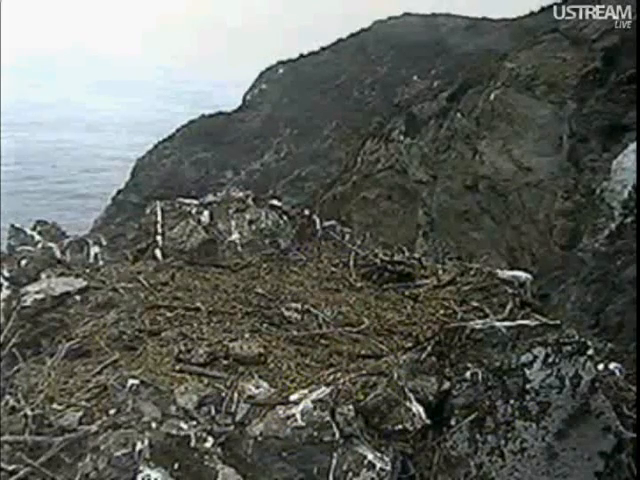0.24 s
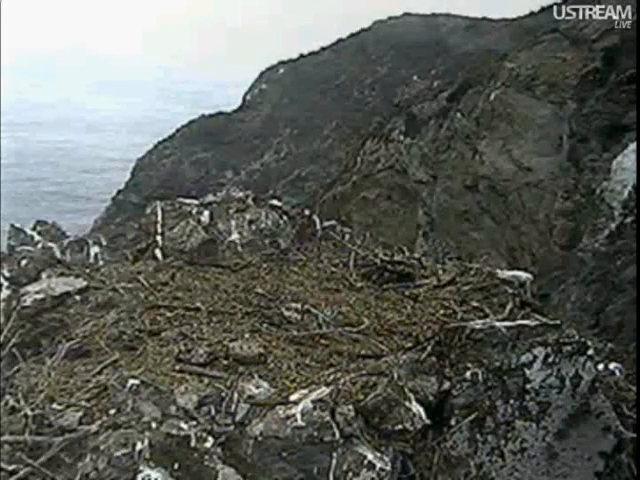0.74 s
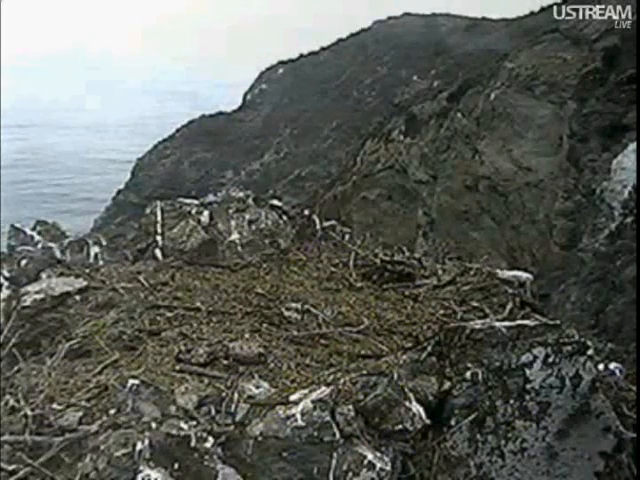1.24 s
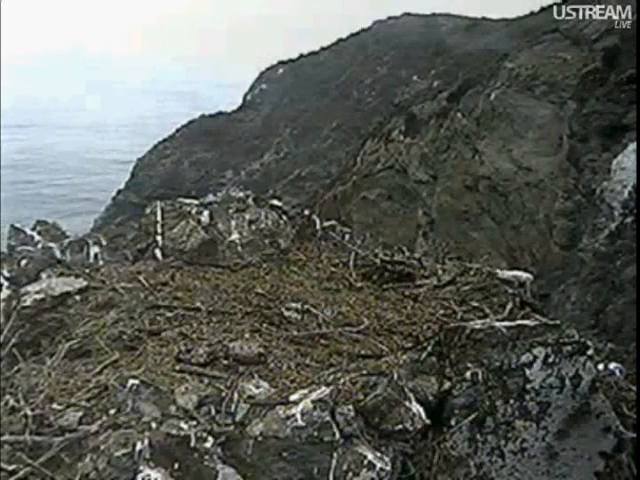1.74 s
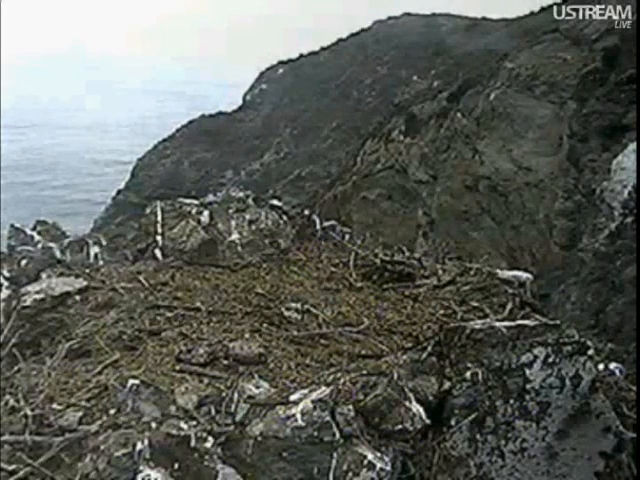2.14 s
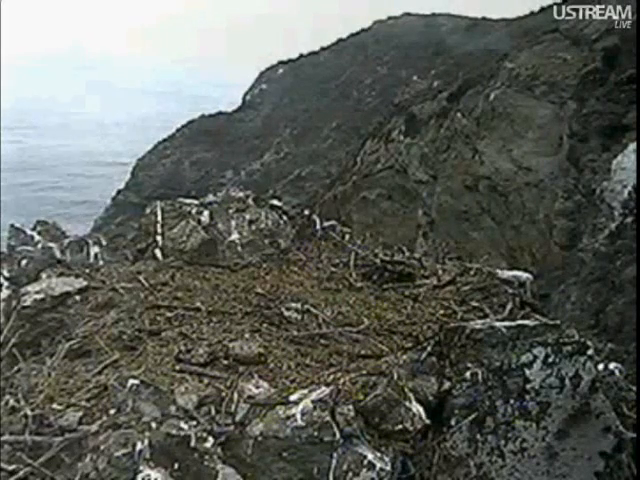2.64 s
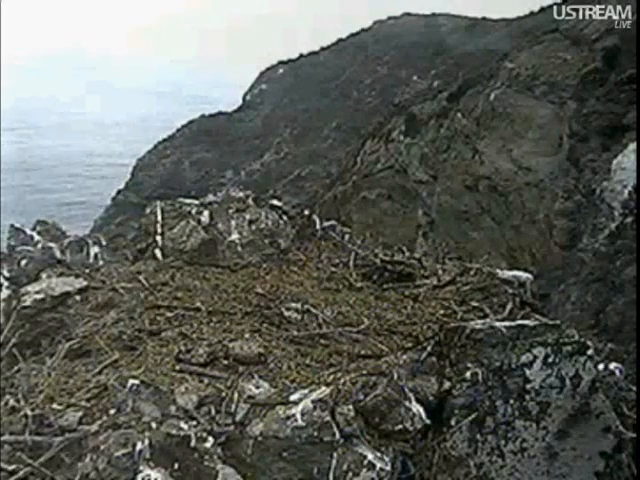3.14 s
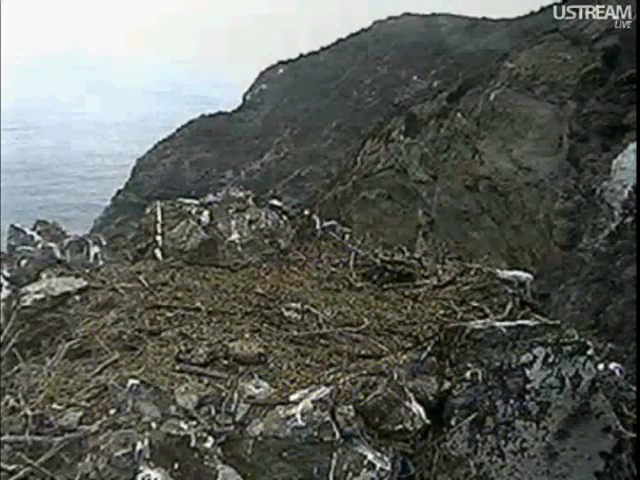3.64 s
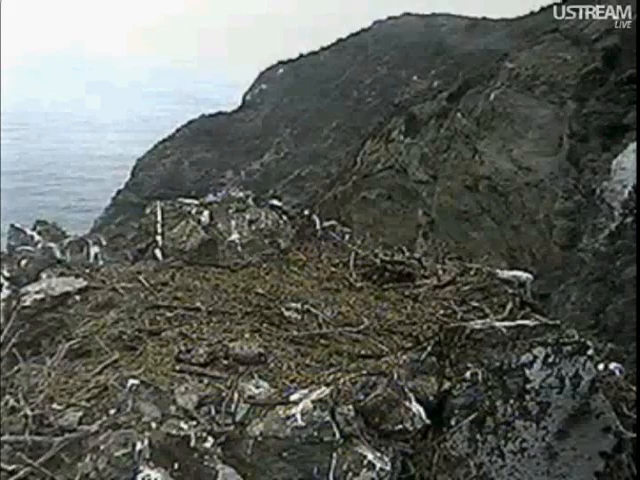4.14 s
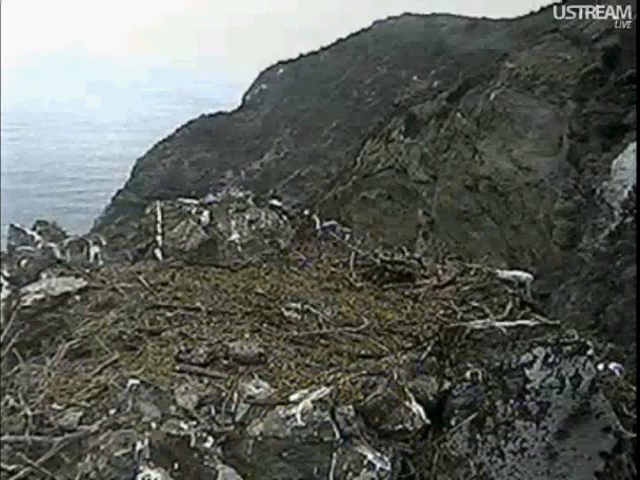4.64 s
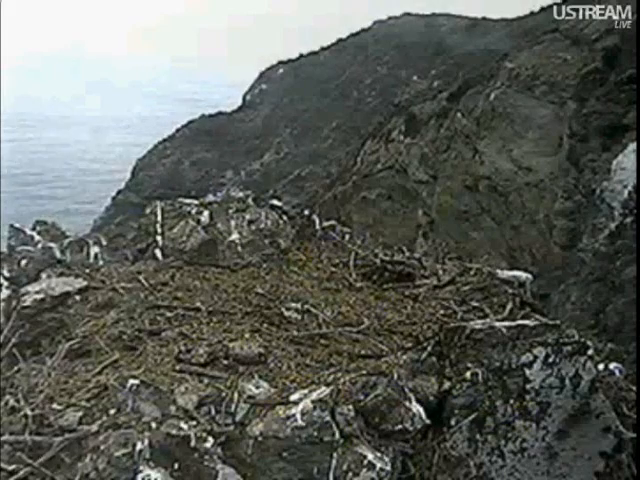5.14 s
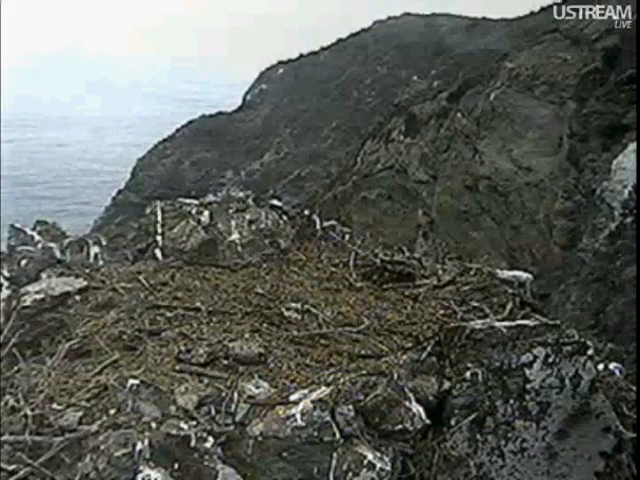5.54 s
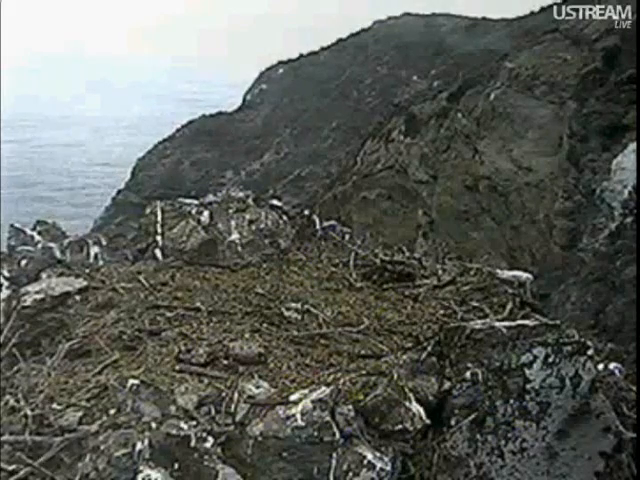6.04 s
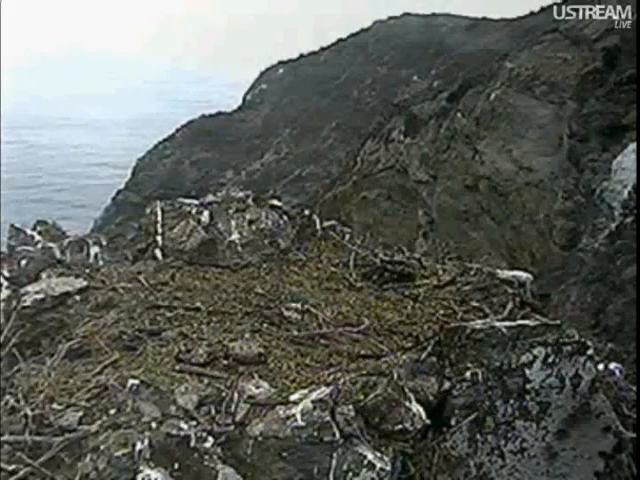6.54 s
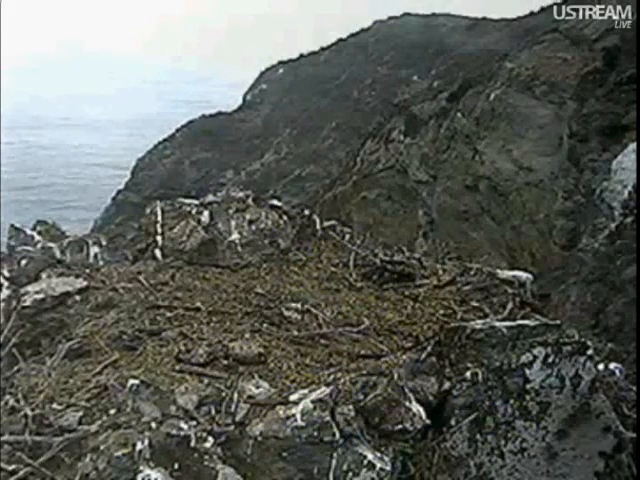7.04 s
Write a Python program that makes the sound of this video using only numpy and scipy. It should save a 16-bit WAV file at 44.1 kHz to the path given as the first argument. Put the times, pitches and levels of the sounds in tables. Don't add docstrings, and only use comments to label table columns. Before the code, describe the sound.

High, quick bird trills, clucks and hard yelps come in bursts with rocky echoes, above a constant distant surf wash.

```python
import sys
import numpy as np
from scipy import signal
from scipy.fft import rfft, irfft, next_fast_len
from scipy.io import wavfile
from scipy.ndimage import uniform_filter1d

SR = 44100
rng = np.random.default_rng(int(sys.argv[2]) if len(sys.argv) > 2 else 0)


def gain_from_db(level_db):
    decades = np.asarray(level_db, float) / 20
    return 10 ** decades


def file_out(sig):
    cols = np.atleast_2d(sig).T
    lim = np.clip(cols, -1, 1)
    pcm = np.round(lim * 32767).astype(np.int16)
    wavfile.write(sys.argv[1], SR, pcm)


N = 321930


def evened(x):
    return x / np.sqrt(np.mean(x ** 2) + 1e-20)


def smoothed(x, size):
    return uniform_filter1d(uniform_filter1d(x, size=size), size=size)


def add(mix, start_s, sound):
    part = mix[max(round(start_s * SR), 0):][:len(sound)]
    part += sound[:len(part)]


def coloured(x, gain):
    size = next_fast_len(len(x))
    return irfft(rfft(x, size) * gain(np.fft.rfftfreq(size, 1 / SR)), size)[:len(x)]


def whistle(length_s, start_hz, mid_hz, end_hz, partials_db, rough, bounce,
            sharp=2.4, fade_db=5.0, rise_s=0.0044, size=130):
    u = np.linspace(0, 1, max(round(length_s * SR), 64))
    luck = rng.random(2)
    air = rng.standard_normal((2, 5000))
    arch = (1 - abs(2 * u - 1) ** sharp) * (mid_hz - (start_hz + end_hz) / 2)
    pitch_hz = start_hz + (end_hz - start_hz) * u + arch
    turns = np.cumsum(pitch_hz) / SR + luck[0]
    shimmer = evened(smoothed(air, size))[:, 300:300 + len(u)]
    blur = np.sqrt(1 - rough) + np.sqrt(rough) * (shimmer[0] + 1j * shimmer[1]) / np.sqrt(2)
    tone = sum(gain_from_db(db) * np.exp(2j * np.pi * (k + 1) * turns) for k, db in enumerate(partials_db))
    onset = np.minimum(u * length_s / min(rise_s, 0.55 * length_s), 1)
    release = np.minimum((1 - u) * length_s / 0.0071, 1)
    tone = (tone * blur).imag * onset * release * gain_from_db(fade_db * (.5 - u))
    lag = round(SR * (.007 + .006 * luck[1]))
    return np.r_[tone, np.zeros(lag)] + bounce * np.r_[np.zeros(lag), tone]


def upper_trills():
    # start_s, length_s, pitch_hz, level_db, fade_db (across the note)
    upper_notes = [(1.185, 0.011, 4000, -43, 0), (1.198, 0.027, 4147, -27.5, 3),
                   (1.301, 0.043, 4310, -38, 6), (1.431, 0.064, 4300, -41, 15),
                   (2.401, 0.037, 4020, -46, 0), (2.041, 0.047, 4010, -53, 0), (2.132, 0.033, 4100, -31, 4),
                   (2.241, .062, 4090, -36.5, 20), (2.46, 0.018, 3820, -44, 0),
                   (4.532, 0.033, 4110, -42, -5), (4.805, 0.048, 4110, -32.5, 7),
                   (4.934, 0.054, 4070, -35, -3), (5.079, 0.035, 3950, -39.5, 0),
                   (6.066, 0.06, 4190, -37.5, -3), (6.172, 0.046, 4470, -29, -4),
                   (6.278, 0.039, 4470, -29, -3), (6.479, .042, 4280, -33.5, 0.5),
                   (6.58, 0.046, 4130, -35.5, 8), (6.727, 0.0099, 4520, -45, 1),
                   (7.139, 0.024, 4160, -31, 4), (7.255, 0.037, 4120, -35, 9), (2.342, .04, 4000, -40, 9)]
    return [(s, n, hz * (1 - 0.042), hz, hz * (1 - 0.0098), db, fade, .009)
            for s, n, hz, db, fade in upper_notes]


def lower_trills():
    # start_s, length_s, pitch_hz, level_db
    lower_notes = [(1.217, 0.032, 3350, -39), (1.306, .04, 3130, -47), (1.423, 0.019, 3460, -41),
                   (1.463, 0.016, 3300, -34.5), (1.786, .05, 3320, -70), (2.03, 0.03, 3125, -47),
                   (2.126, 0.019, 3170, -36.5), (2.16, 0.017, 3190, -40), (2.23, 0.058, 3210, -49),
                   (2.35, 0.02, 3190, -50), (2.454, 0.035, 3084, -38.5), (2.732, .04, 3080, -54),
                   (4.603, 0.02, 3200, -42), (4.618, 0.019, 3125, -37.5), (4.674, 0.016, 3260, -37.5),
                   (4.806, .016, 3145, -39.5), (4.765, 0.013, 3190, -25.5), (4.936, 0.038, 3220, -30.5),
                   (5.079, 0.025, 3190, -32.5), (5.111, 0.028, 3090, -40.5), (5.327, 0.076, 3034, -45.5),
                   (6.169, .03, 3240, -48.5), (6.291, 0.029, 3152, -33.5), (6.512, 0.017, 3380, -29.5),
                   (6.702, 0.023, 3455, -27.5), (7.115, 0.048, 3320, -44), (7.153, 0.032, 3254, -37),
                   (7.253, 0.017, 3370, -31.5), (7.286, 0.045, 3210, -30.5)]
    return [(s, n, hz * (1 - 0.0076), hz, hz * (1 - 0.011), db, 5.5, .005) for s, n, hz, db in lower_notes]


def hooked_falls():
    # start_s, length_s, top_hz, level_db, fade_db (across the note)
    fall_notes = [(4.426, 0.056, 4147, -31.5, 4.5), (4.562, 0.02, 4390, -33.5, -2),
                  (4.583, .02, 4250, -42, -3), (7.025, 0.035, 4210, -38.5, -3),
                  (7.126, 0.014, 4280, -36, 2), (7.238, 0.025, 4230, -40, 0),
                  (4.67, 0.049, 4215, -32.5, -1), (6.378, 0.045, 4420, -32.5, 6)]
    return [(s, n, hz * (1 - 0.043), hz, hz * (1 - 0.088), db, fade, .009)
            for s, n, hz, db, fade in fall_notes]


def stray_chips():
    # start_s, length_s, pitch_hz, level_db
    stray_notes = [(0, 0.027, 3120, -33.5), (0.036, 0.097, 3140, -46), (0.092, 0.019, 3160, -44),
                   (0.267, 0.011, 3020, -32), (0.331, 0.009, 3990, -39), (0.705, 0.007, 3290, -47),
                   (0.774, 0.012, 3090, -29.5), (0.784, 0.0093, 3110, -33.5), (1.388, .014, 3040, -33.5),
                   (1.355, 0.017, 3140, -37), (1.099, 0.012, 3340, -41.5), (1.119, 0.022, 2940, -36),
                   (1.132, 0.021, 3070, -31.5), (1.121, 0.01, 3590, -40), (1.44, 0.011, 2670, -46),
                   (2.03, 0.01, 1320, -54), (2.937, 0.032, 2465, -50.5), (0.334, 0.021, 3086, -31),
                   (3.555, 0.021, 3120, -45.5), (3.642, 0.015, 3000, -52), (3.805, 0.041, 3090, -55),
                   (4.094, .046, 3210, -59), (4.15, 0.043, 3600, -64), (4.56, 0.06, 5110, -40.5),
                   (4.681, 0.05, 5110, -48), (4.73, 0.045, 5220, -54), (5.719, 0.031, 3010, -55),
                   (6.047, 0.026, 1430, -50.5), (6.053, 0.022, 2975, -43.5), (7.035, 0.062, 3500, -43)]
    return [(s, n, hz * (1 - 0.011), hz, hz * (1 - 0.011), db, 5.5, .0045) for s, n, hz, db in stray_notes]


def far_notes(perches):
    notes = upper_trills() + lower_trills() + hooked_falls() + stray_chips()
    for k, (s, length, start, mid, end, db, fade_db, rise_s) in enumerate(notes):
        rough = np.clip((-27 - db) / 55, .03, .27)
        partials_db = [db, 1.5 * db - 18.5]
        add(perches[k % 2], s, whistle(length, start, mid, end, partials_db, rough, 0.21,
                                       2.14, fade_db, rise_s, size=105))


def yelps(perches):
    # start_s, length_s, pitch_hz, level_db, beats_per_s
    yelp_notes = [(1.55, 0.046, 3450, -26, 42), (1.657, 0.037, 3360, -23.5, 56),
                  (5.217, .04, 3070, -24, 76), (6.676, 0.026, 3330, -16.5, 125),
                  (7.004, 0.025, 3380, -14, 66)]
    for k, (s, length, hz, db, beats) in enumerate(yelp_notes):
        end = hz + 330 - 9000 * length
        note = whistle(length, hz - 130, hz, end, [db, 1.77 * db - 14.0], 0.036, .2, fade_db=2.0)
        throb = np.sqrt(abs(np.sin(np.pi * beats * np.arange(len(note)) / SR)))
        add(perches[k % 2], s, note * (1 - .85 * (1 - throb)))


def low_bird(perch):
    # start_s, length_s, pitch_hz, level_db (fundamental), octave_db
    low_notes = [(0.255, 0.013, 2480, -31, -60), (0.265, 0.015, 2570, -29, -49),
                 (0.698, 0.013, 2510, -35, -61), (.706, 0.013, 2580, -34, -50.5),
                 (1.108, 0.012, 2490, -28.5, -56), (3.645, 0.0097, 2800, -41, -44),
                 (4.622, 0.026, 2560, -46.5, -68), (4.767, 0.034, 2560, -45, -58),
                 (6.17, 0.04, 2620, -59, -39), (6.229, 0.052, 2583, -29, -34.5),
                 (6.309, 0.059, 2666, -25, -26.5), (6.395, 0.06, 2668, -24, -25.5),
                 (6.498, 0.034, 2621, -32.5, -18.5), (6.598, 0.039, 2578, -18.5, -26.5),
                 (6.705, 0.027, 2503, -25, -44), (6.731, 0.0083, 1950, -27.5, -35),
                 (6.815, .02, 1891, -28.5, -38), (6.934, 0.0076, 1540, -29, -28.5)]
    for s, length, mid, db, octave_db in low_notes:
        third_db = min(db, octave_db) - 15.5
        edge = mid - 1600 * length
        fade_db = 12.0 if length < .033 else 1.5
        add(perch, s, whistle(length, edge, mid, edge, [db, octave_db, third_db], .025, .15,
                              fade_db=fade_db, rise_s=max(.13 * length, .004)))


def chatter(perches):
    # start_s, length_s, lowest_hz, level_db
    chatter_notes = [(0.249, 0.052, 3120, -44.5), (0.298, 0.032, 3390, -43), (.352, 0.035, 3060, -37),
                     (0.693, .037, 3120, -43.5), (0.733, 0.041, 2914, -44.5), (1.1, 0.018, 3070, -40.5),
                     (2.74, 0.015, 2820, -51), (4.8, 0.023, 3140, -41), (6.375, 0.018, 3380, -40),
                     (6.475, 0.018, 3030, -40.5), (6.56, 0.021, 3060, -39.5), (6.58, .018, 3150, -32.5),
                     (6.215, 0.037, 3050, -48.5), (6.31, 0.041, 3030, -46), (6.405, 0.04, 3110, -46),
                     (6.315, 0.023, 3850, -47.5), (6.42, 0.033, 3890, -50), (6.6, .04, 3030, -43),
                     (6.525, .03, 3150, -43.5), (.272, 0.033, 3440, -45), (.74, .035, 3350, -44)]
    for k, (s, length, low, db) in enumerate(chatter_notes):
        edge = low * (1 + 0.11)
        add(perches[k % 2], s, whistle(length, edge, low, edge, [db], .4, bounce=0.38, size=60))


def peeps(perch):
    # start_s, length_s, lowest_hz, level_db
    peep_notes = [(1.353, .05, 2680, -46), (2.254, 0.055, 2670, -39.5), (3.641, 0.053, 2676, -44),
                  (4.168, 0.044, 2770, -43.5), (6.083, 0.046, 2770, -43.5)]
    for s, length, low, db in peep_notes:
        add(perch, s, whistle(length, low * 1.6, low, low * 1.4, [db], .12, 0.3, 1.4, fade_db=-6.5))


def squeaks(perch):
    # start_s, length_s, final_hz, level_db
    squeak_notes = [(0.266, 0.014, 2940, -36), (1.29, 0.031, 5120, -44.5), (4.543, 0.016, 5060, -38),
                    (4.667, 0.011, 5050, -45)]
    for s, length, end, db in squeak_notes:
        add(perch, s, whistle(length, end * 1.15, end * 1.03, end, [db], .4, .4, 1.4))


def murmurs(perch):
    # start_s, length_s, pitch_hz, level_db
    murmur_notes = [(2.3, 0.031, 3060, -56), (2.51, .06, 4020, -58), (2.593, 0.046, 3960, -61),
                    (4.63, .04, 5150, -58), (4.78, 0.061, 5200, -57), (6.363, 0.029, 2590, -29),
                    (6.449, 0.052, 2582, -36.5), (6.525, 0.018, 2575, -23), (6.628, 0.029, 2625, -55),
                    (2.023, 0.013, 1430, -40.5), (2.04, 0.013, 1530, -52), (0.133, 0.058, 3210, -50),
                    (1.347, .075, 4340, -53), (1.497, .1, 4230, -57), (2.506, .05, 3070, -49),
                    (2.585, .065, 3140, -47.5), (5.263, .06, 3040, -48.5), (5.392, .09, 3030, -52),
                    (5.0, .07, 3210, -57), (6.237, .035, 4350, -43)]
    for s, length, hz, db in murmur_notes:
        add(perch, s, whistle(length, hz, hz, hz, [db], rough=.12, bounce=.2))


def ticks():
    # start_s, level_db, centre_hz, width_hz
    tick_events = [(0.272, -43, 3600, 1500), (0.31, -46, 3420, 1200), (0.316, -49, 5200, 500),
                   (0.335, -46, 5300, 500), (0.777, -47, 5300, 500), (1.119, -46, 5100, 500),
                   (0.74, -44, 3400, 1000), (0.694, -40, 3200, 1200), (1.103, -45, 3200, 1200),
                   (1.194, -43, 1400, 800), (1.302, -41.5, 5100, 2490), (1.432, -43.5, 4480, 2960),
                   (2.952, -36, 1190, 400), (4.804, -47, 3620, 1190), (4.935, -41, 3300, 1000),
                   (4.937, -47, 2600, 400), (6.18, -44, 3220, 900), (6.17, -39.5, 5340, 1200),
                   (6.285, -32, 3840, 2150), (6.477, -36, 3500, 1000), (6.6, -30, 3600, 2540),
                   (6.708, -35, 4500, 1800), (6.932, -33, 1100, 600), (7.052, -32.5, 1020, 300),
                   (7.124, -47.5, 4070, 3550)]
    out = np.zeros(N)
    puffs = rng.standard_normal((len(tick_events), 270))
    for (s, db, centre, width), puff in zip(tick_events, puffs):
        band = coloured(puff, lambda hz: np.exp(-((hz - centre) / width) ** 2 * 2))
        add(out, s - .003, gain_from_db(db) / 3 * evened(band) * np.hanning(len(puff)))
    return out


def eagles():
    perches = np.zeros((3, N))
    far_notes(perches)
    yelps(perches)
    chatter(perches)
    low_bird(perches[2])
    peeps(perches[2])
    squeaks(perches[2])
    murmurs(perches[2])
    return perches + ticks()


def cliff(perches):
    # delay_s, level_db
    ledges = [(.006, -4), (.011, -2), (.019, -20.5), (.034, -13.5), (.052, -21), (.11, -17), (.16, -15.5)]
    t = np.arange(SR) / SR
    taps = rng.choice([-1., 1.], (3, SR)) * (rng.random((3, SR)) < 2000 / SR) / np.sqrt(2000)
    near_tail = gain_from_db(2.5 - 60 * t / 0.2)
    cove_tail = gain_from_db(-4.5 - 60 * t / 1.38)
    taps *= (near_tail + cove_tail) * np.minimum(t / 0.02, 1)
    stretch = rng.uniform(.8, 1.25, (3, len(ledges)))
    for k, (s, db) in enumerate(ledges):
        taps[np.arange(3), (s * stretch[:, k] * SR).astype(int)] += gain_from_db(db - 1.5)
    taps *= gain_from_db([[0.5], [0.5], [-6.0]])
    echoes = signal.fftconvolve(perches, taps, axes=1)[:, :N].sum(0)
    echoes = signal.hilbert(echoes, next_fast_len(N))[:N]
    gusts = evened(smoothed(rng.standard_normal((2, N)), 400))
    return (echoes * (.97 + .12 * (gusts[0] + 1j * gusts[1]))).real


def surf():
    # frequency_hz, density_db (per Hz)
    wash_spectrum = [(12, -32.5), (20, -2), (33, -23.5), (86, -33), (181, -32.5), (210, -38.5), (232, -32),
                     (420, -26), (705, -23.5), (779, -21), (1100, -13.5), (1480, -29), (3040, -35.5),
                     (3350, -37), (7400, -38.5), (9620, -75.5), (16300, -120)]
    # time_s, level_db
    wash_level = [(0, -45), (1.5, -45.5), (3, -44.5), (3.8, -46), (5, -44.5), (6, -44.5), (6.9, -43.5),
                  (7.3, -44)]
    # centre_hz, width_hz, level_db
    resonances = [(1100, 53, -11.5), (3140, 440, -27.5)]
    frames, hz = N // 256 + 5, np.fft.rfftfreq(1024, 1 / SR)
    a, b, patches = rng.standard_normal((frames, 513, 3)).T
    patches = evened(uniform_filter1d(uniform_filter1d(patches, 8, 0), 10, 1))
    f, db = np.transpose(wash_spectrum)
    power = gain_from_db(2 * np.interp(np.log(hz + 1), np.log(f + 1), db))
    for centre, width, ring_db in resonances:
        power += gain_from_db(2 * ring_db) / (1 + (2 * (hz - centre) / width) ** 2) ** 2
    z = (a + 1j * b) * np.sqrt(power)[:, None] * gain_from_db(patches)
    wash = evened(signal.istft(z, nperseg=1024, noverlap=768)[1][:N])
    return wash * gain_from_db(np.interp(np.arange(N) / SR, *np.transpose(wash_level)) + 1.5)


def hum():
    # frequency_hz, level_db
    mains = [(60, -72.5), (120, -89.5), (180, -75), (240, -73.5)]
    # frequency_hz, level_db
    whine_tone = (10587, -91)
    t = np.arange(N) / SR
    return sum(np.sqrt(2) * gain_from_db(db) * np.sin(2 * np.pi * (hz * t + rng.random()))
               for hz, db in mains + [whine_tone])


def thinned(x, reach_db=52.5, band_hz=500):
    hz, t, z = signal.stft(x, SR / 2, nperseg=1024, noverlap=768)
    band = uniform_filter1d(abs(z) ** 2, max(round(band_hz / hz[1]), 1), axis=0)
    loudest = (band * np.clip(hz / 5200, 0, 1)[:, None] ** 4).max(0)
    keep = (band > loudest * gain_from_db(-2 * reach_db)) | (hz < 3800)[:, None]
    bass = (hz > 95) & (hz < 165)
    rumble = uniform_filter1d((abs(z[bass]) ** 2).mean(0), size=5)
    keep[bass] &= rumble > np.quantile(rumble, .35)
    return signal.istft(z * np.where(keep, 1, .1), SR / 2, nperseg=1024, noverlap=768)[1][:len(x)]


def scene():
    perches = eagles()
    return (perches.sum(0) + cliff(perches) + surf())[None]


def roll_off(x):
    return signal.sosfilt(signal.butter(12, 17140, fs=SR, output="sos"), x)


def record(dry):
    crack_event = (6.6035, -19)
    limited = coloured(dry[0], lambda hz: np.where(hz < 7450, 1, gain_from_db(-42.0)))
    hiss = coloured(rng.standard_normal(N), lambda hz: (hz < SR / 4) / (1 + (hz / 9000) ** 4))
    half_rate = (limited + gain_from_db(-58.5) * hiss + hum())[::2]
    held = np.repeat(thinned(half_rate), 2)[:N]
    crack = coloured(signal.unit_impulse(89, 'mid'), lambda hz: np.clip(hz / 5000, 0, 1) ** 2)
    add(held, crack_event[0] - .001, gain_from_db(crack_event[1]) * crack)
    mix = coloured(held, lambda hz: hz < 15780)[None] + .0539
    return roll_off(mix)


dry = scene()
out = record(dry)
file_out(out)
```